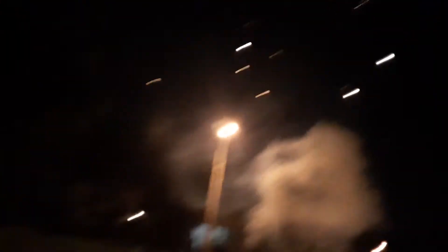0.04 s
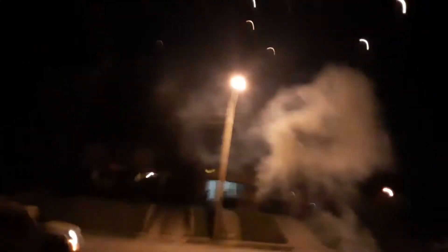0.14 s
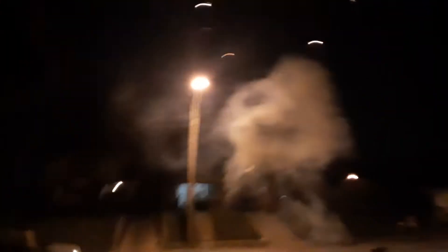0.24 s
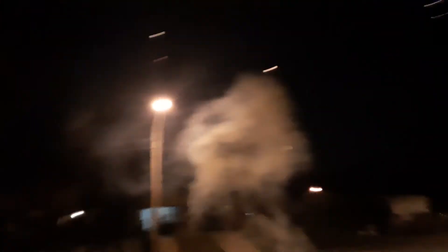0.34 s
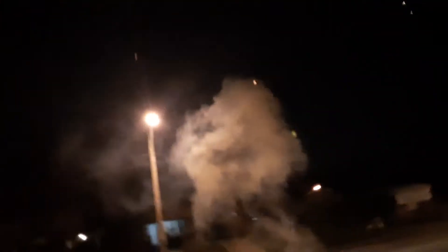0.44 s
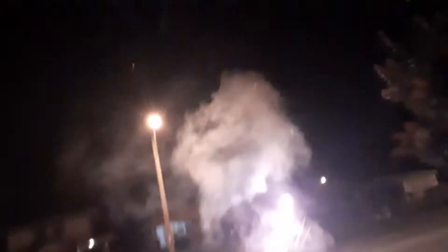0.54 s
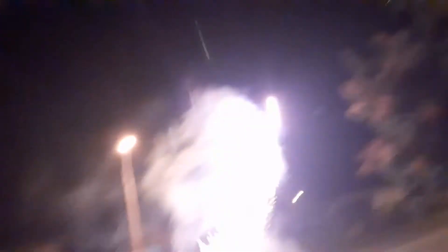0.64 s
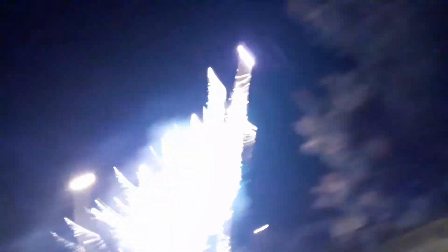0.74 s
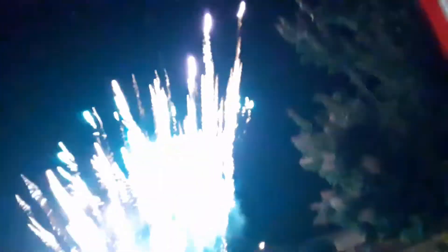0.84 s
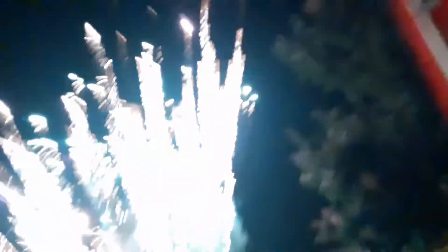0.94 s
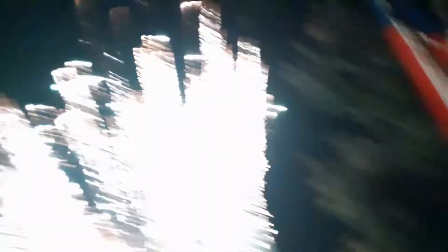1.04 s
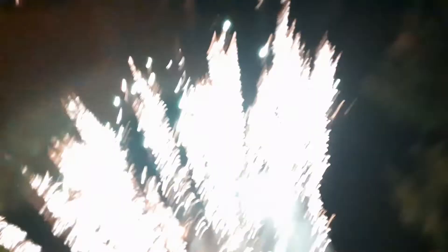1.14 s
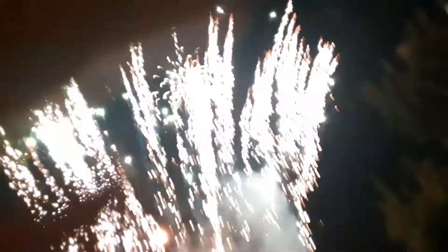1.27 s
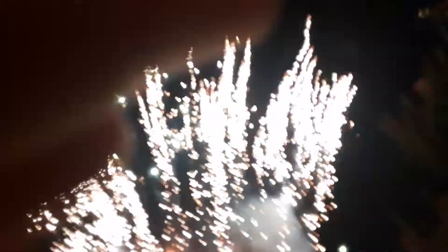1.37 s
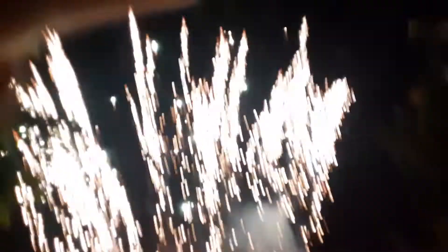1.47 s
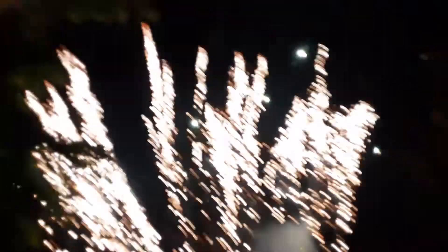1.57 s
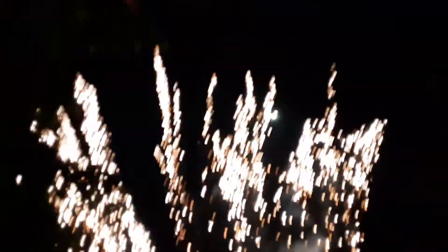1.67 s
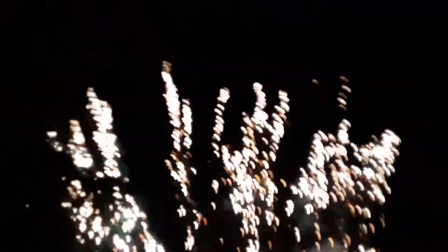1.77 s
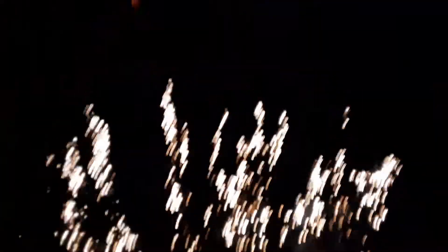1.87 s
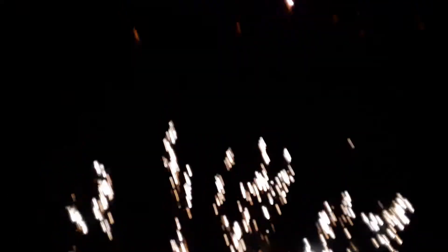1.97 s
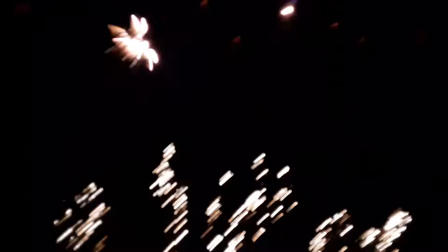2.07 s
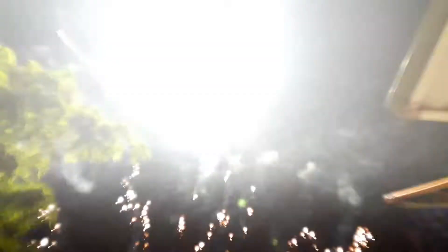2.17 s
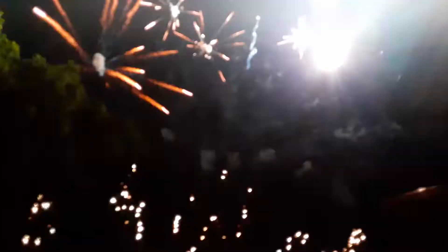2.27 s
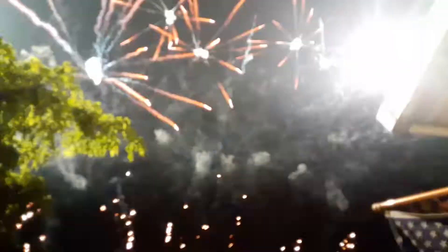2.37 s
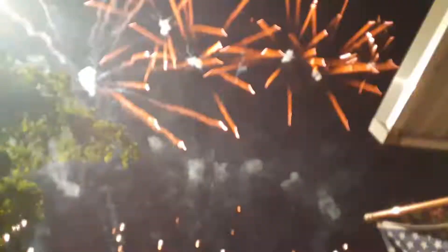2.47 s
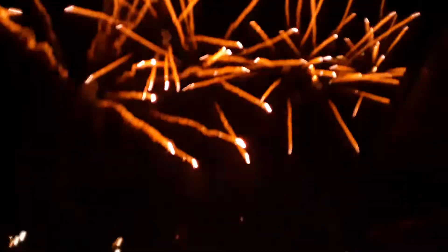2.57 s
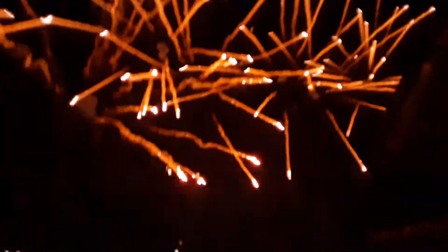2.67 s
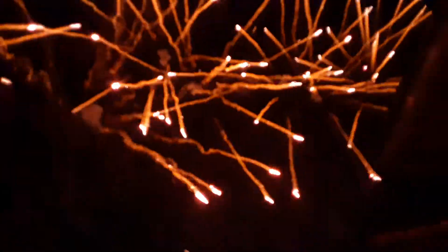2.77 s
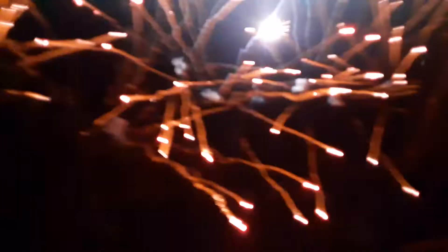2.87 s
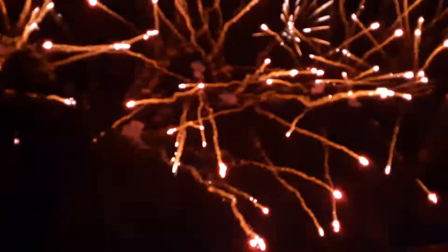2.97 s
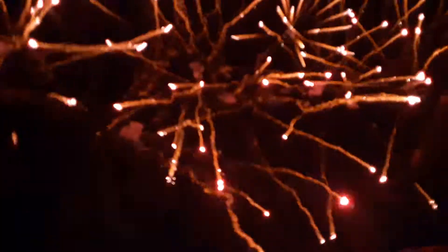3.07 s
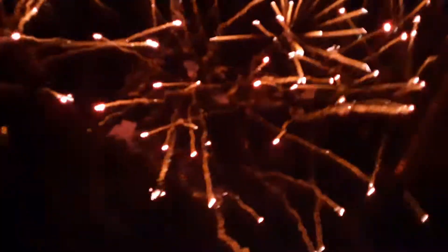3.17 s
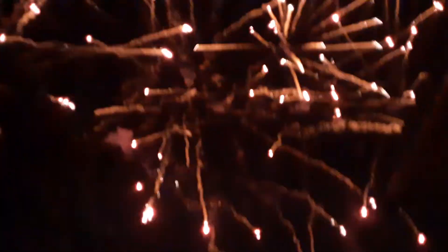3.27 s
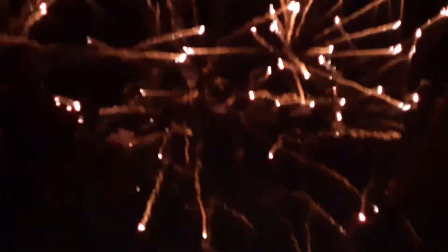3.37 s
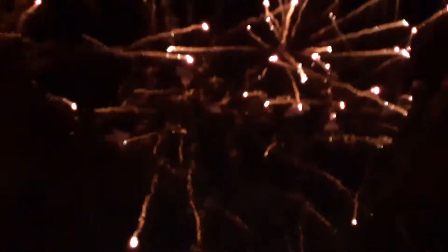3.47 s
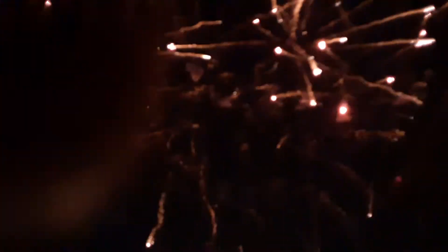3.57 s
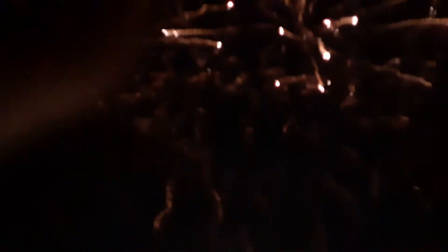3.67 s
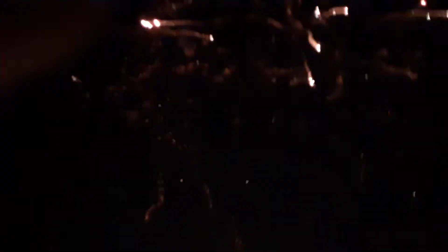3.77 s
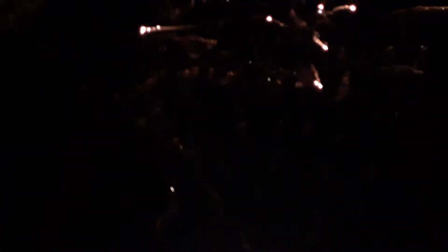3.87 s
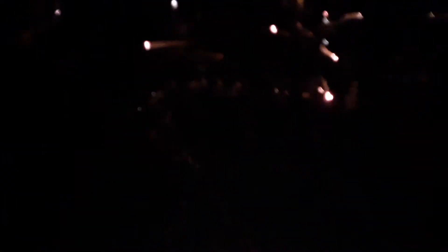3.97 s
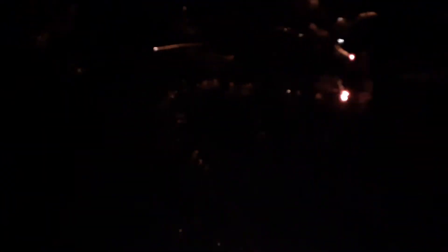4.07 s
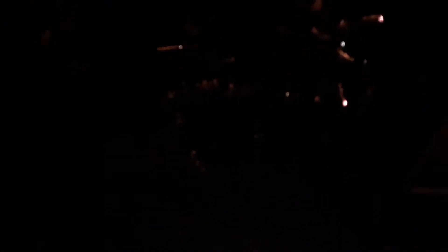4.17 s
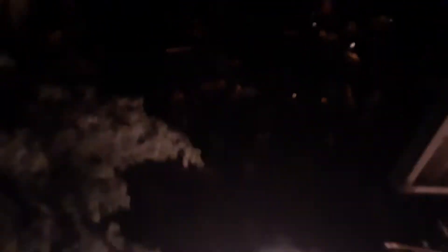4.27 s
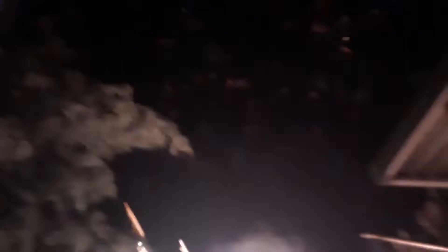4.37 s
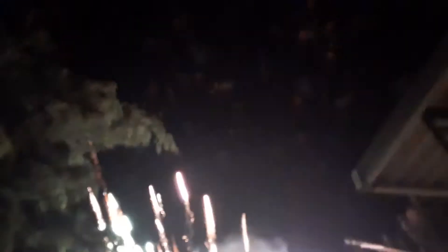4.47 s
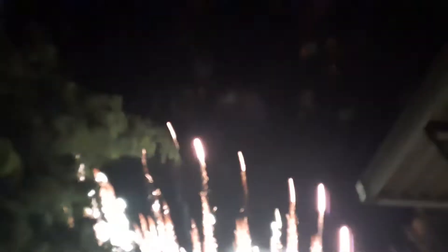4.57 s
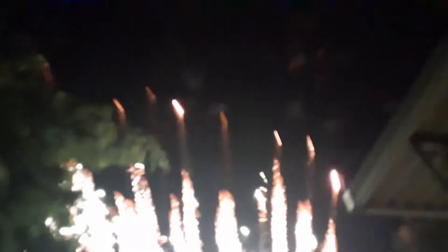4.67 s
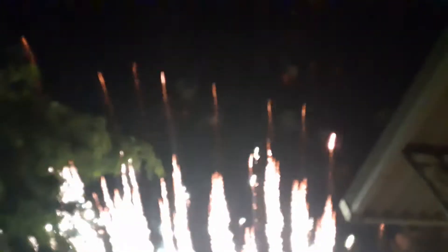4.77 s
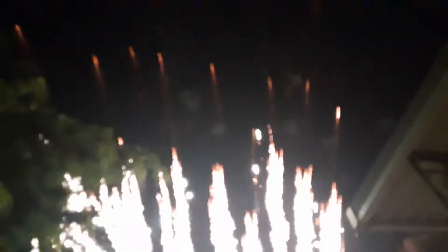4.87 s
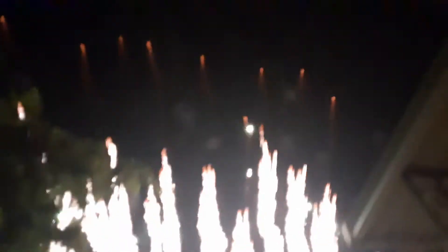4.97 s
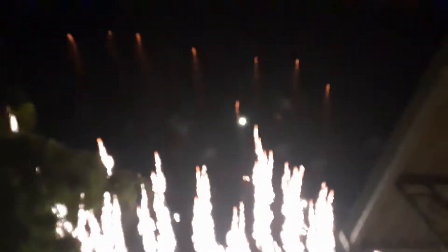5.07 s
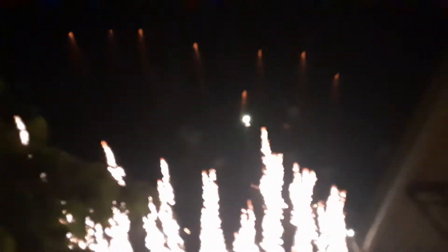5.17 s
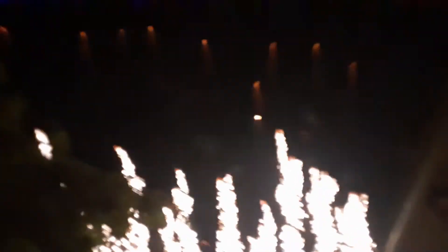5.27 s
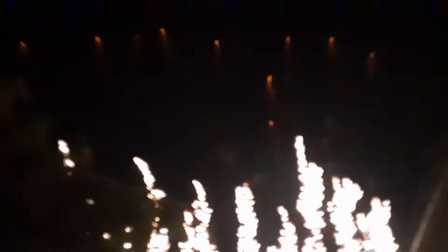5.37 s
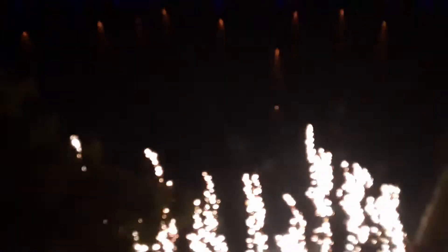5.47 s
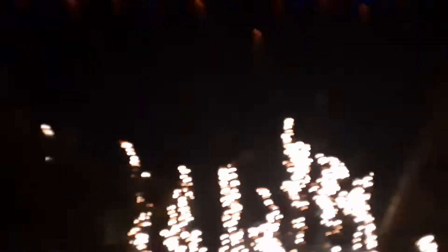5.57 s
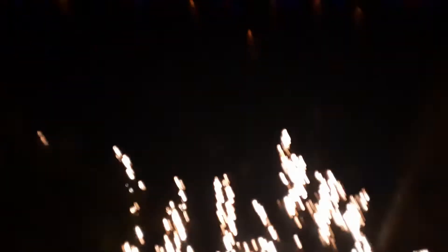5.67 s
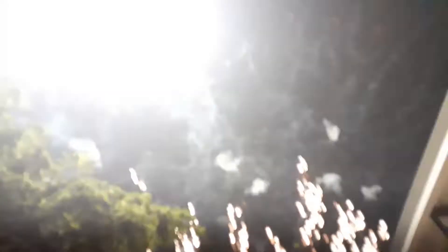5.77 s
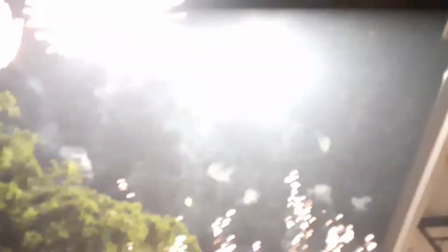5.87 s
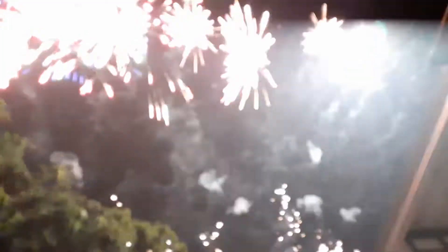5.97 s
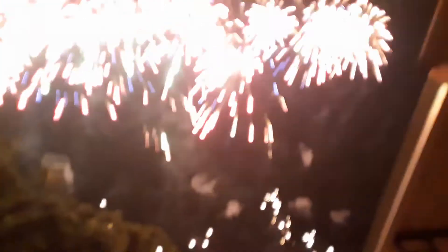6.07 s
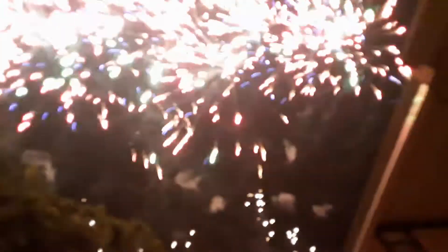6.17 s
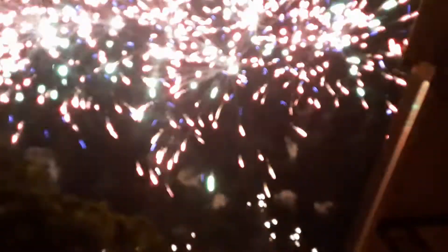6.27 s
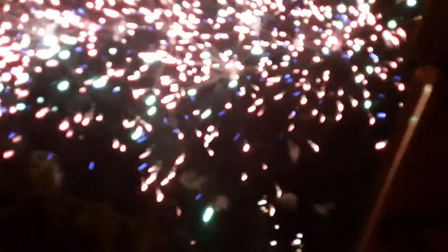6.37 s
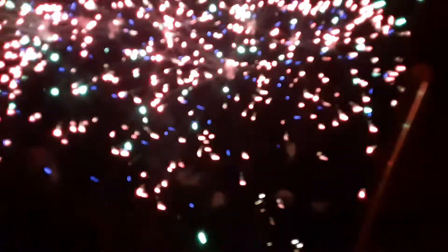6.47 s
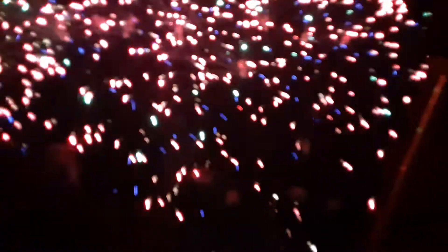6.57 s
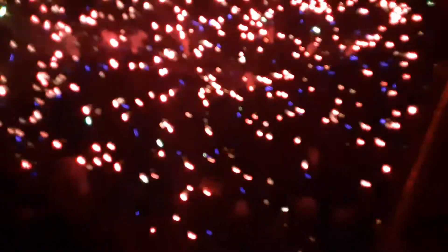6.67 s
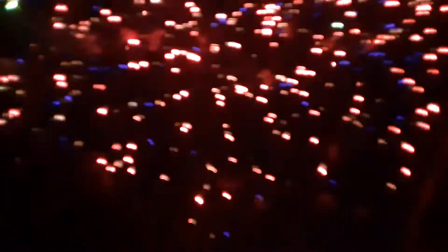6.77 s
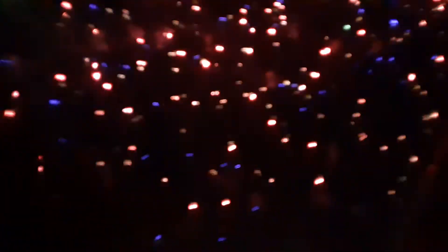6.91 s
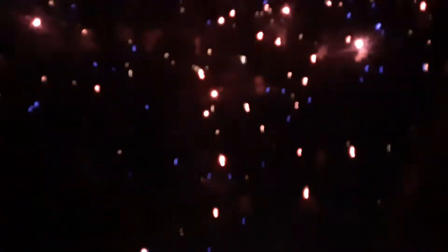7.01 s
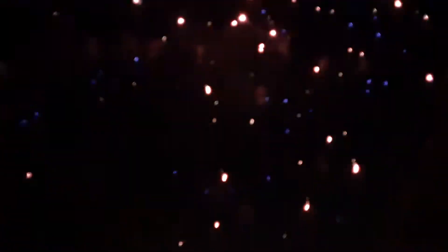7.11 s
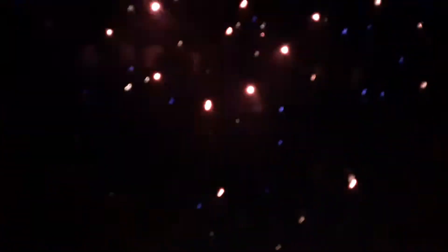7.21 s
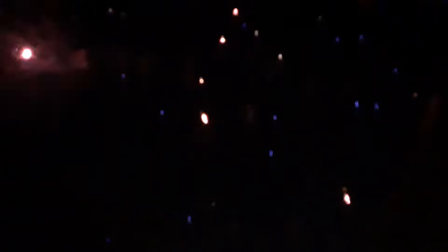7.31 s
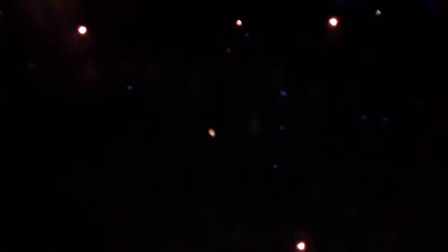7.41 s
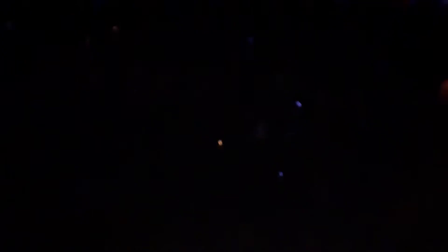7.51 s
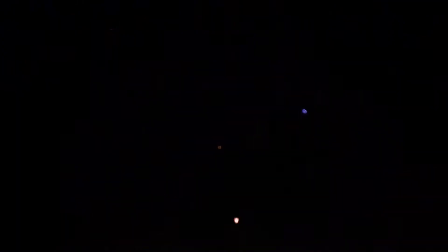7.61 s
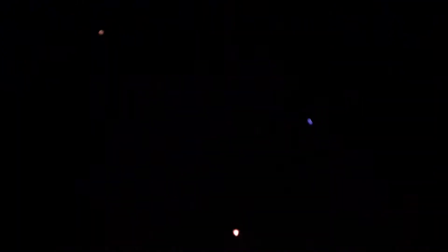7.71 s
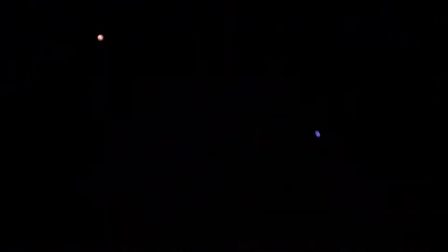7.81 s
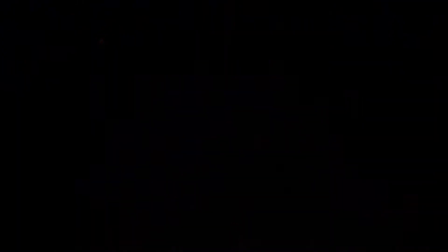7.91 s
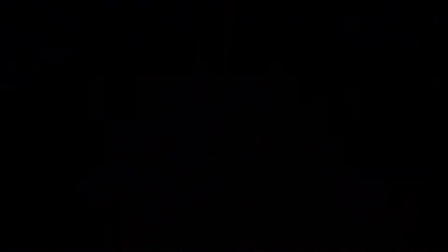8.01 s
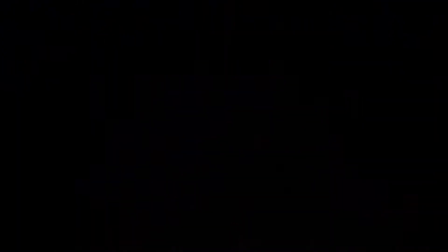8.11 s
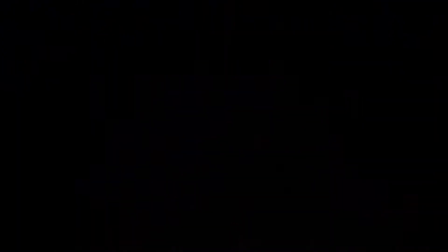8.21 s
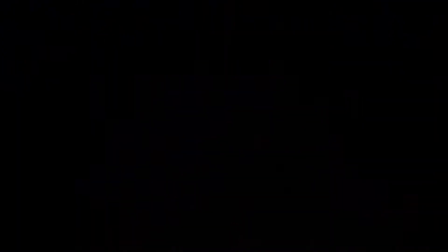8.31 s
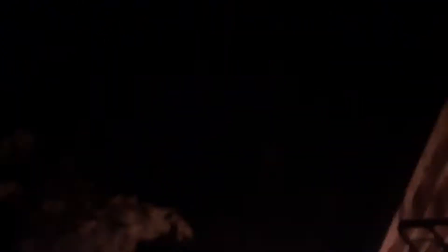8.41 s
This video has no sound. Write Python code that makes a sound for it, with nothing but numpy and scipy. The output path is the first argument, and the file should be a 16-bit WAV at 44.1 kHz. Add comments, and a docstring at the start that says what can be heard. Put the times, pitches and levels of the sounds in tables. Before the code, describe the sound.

A faint fuse hiss rises, and at 0.6 seconds a multi-shot firework fires about eleven sharp cracks with hollow thumps within a quarter second, echoing around a yard. Comets hiss softly as it fades, and a star crackles briefly at 1.3 seconds. From 2.1 to 2.6 seconds shells burst overhead in loud, uneven bangs with a few tiny pings, and one more bangs at 3 seconds. Each trails off among houses and trees. A second, slightly duller volley fires at 4.2 seconds. After a brief soft hiss, its shells burst in a tight cluster from 5.9 to 6.2 seconds and the echo dies away. Distant fireworks thud at about 8.1 and 8.3 seconds, and a third volley just begins at 8.4 seconds. A faint low hum and town rumble lie underneath. The phone microphone squashes the loudest peaks.

```python
"""A firework cake fires two quick volleys in a yard at night, and a third just begins. Each lift charge
sends out a shock wave, heard as a sharp crack, and sets its tube resonating with a hollow thump. About
a second and a half after a volley its shells burst overhead; houses and trees reflect every bang. Fuses
and comets hiss, a star crackles, and far fireworks thud over a low hum and the rumble of the town.
A phone's microphone colours the sound and its limiter holds down the peaks."""
import sys
import numpy as np
from scipy import signal
from scipy.fft import rfft, irfft
from scipy.io import wavfile
from scipy.ndimage import uniform_filter1d, minimum_filter1d

SR = 44100
rng = np.random.default_rng(int(sys.argv[2]) if len(sys.argv) > 2 else 0)


def output_pcm(signal):
    """Save a mono or channel-first signal as 16-bit PCM at the path in sys.argv[1].

    Samples are clipped to [-1, 1] before scaling.
    """
    pcm = np.clip(np.atleast_2d(signal).T, -1, 1) * 32767
    wavfile.write(sys.argv[1], SR, np.round(pcm).astype(np.int16))


N = 372644

# volleys, lit by a fuse that runs from tube to tube: (first shot [s], gap between shots [s], shots,
# level [dB], treble gain [dB], fuse level [dB], comet level [dB], comet burn time [s])
VOLLEYS = [(0.562, .0255, 11, 0.5, 2, -42, -40, 3.3), (4.235, .0203, 12, -.5, -4, -45.5, -64, .78),
           (8.44, .023, 11, -2, -9, -40.5, -47, 1)]
# low resonances of a shell burst: (frequency [Hz], level [dB], decay time T60 [s])
BURST_MODES = [(116.6, -18, 0.035), (245, 3, 0.018), (322, -6.5, 0.066), (447, -17.5, 0.022)]
# echo spectra of launches and far thuds, and of snaps and pings: (frequency [Hz], level [dB])
LAUNCH_ECHO = [(50, -2.5), (110, 6), (200, -2), (350, 1.5), (550, 5), (1050, 2), (2200, 5.5), (2700, 3.5),
               (3300, 0.5), (4500, 6.5), (7000, 7), (14000, 10.5)]
SNAP_ECHO = [(200, -3.5), (1000, -13.5), (4000, -1.5), (14000, -4)]


def undb(db):
    """Amplitude ratio of a level in decibels."""
    return 10 ** (np.asarray(db) / 20)


def on_log_axis(points, hz):
    """Interpolation of (frequency [Hz], value) points on a logarithmic frequency axis."""
    frequencies, values = np.transpose(points)
    return np.interp(np.log(np.maximum(hz, 1)), np.log(frequencies), values)


def convolve(x, response):
    """Linear filtering: convolution with an impulse response, cut to the input's length."""
    return signal.fftconvolve(np.atleast_2d(x), np.atleast_2d(response), axes=1)[:, :x.shape[-1]]


def colour(points, size=4096):
    """Minimum-phase impulse response of a spectrum, by folding its cepstrum onto positive time."""
    magnitude = undb(on_log_axis(points, np.fft.rfftfreq(size, 1 / SR)))
    cepstrum = irfft(np.log(magnitude))
    cepstrum[1:size // 2] *= 2
    cepstrum[size // 2 + 1:] = 0
    return irfft(np.exp(rfft(cepstrum)))


def unit(response):
    """Normalisation to a mean energy of one per channel."""
    return response / np.sqrt(np.mean(np.sum(response ** 2, axis=-1)))


def add(track, start_s, sound):
    """Superposition: a sound adds to the track from its start time on."""
    i = int(start_s * SR)
    part = sound[..., :max(N - i, 0)]
    track[:, i:i + part.shape[-1]] += part


def stereo_noise(size, apart_hz=800, bass_apart=0.073):
    """Spatial coherence: two microphone ports receive nearly the same bass but unrelated treble."""
    mid, side = rng.standard_normal((2, size))
    treble = signal.lfilter(*signal.butter(1, apart_hz, "high", fs=SR), side)
    side = treble + bass_apart * (side - treble)
    return np.array([mid + side, mid - side]) / np.sqrt(2)


def wavering(spectrum, flicker_db, rate_hz, bass_apart):
    """Random amplitude modulation makes coloured noise flicker; unit RMS."""
    flicker = np.interp(np.arange(N) / SR * rate_hz, np.arange(1024), rng.standard_normal(1024))
    noise = stereo_noise(N, bass_apart=bass_apart)
    sound = convolve(noise, colour(spectrum)) * undb(flicker_db * flicker)
    return sound / np.std(sound)


def yard(x, tint, near_db, near_s, build_s, patchy_db, late_hz=600):
    """Reverberation: dense early reflections off near walls, a long tail off far houses and trees."""
    # reverberation time among the houses: (frequency [Hz], decay time T60 [s])
    decay_times = [(100, 1.27), (330, 1.45), (800, 1.645), (2000, 1.89), (4000, 1.66), (7500, 1.44),
                   (13000, 0.76)]
    size = 2 * SR
    t = np.arange(size) / SR
    hz = np.fft.rfftfreq(size, 1 / SR)
    # single surfaces stand out as louder patches
    patches = np.interp(t, np.linspace(0, 2, 500), rng.standard_normal(500))
    spectrum = rfft(stereo_noise(size, bass_apart=0.033) * undb(patchy_db * patches))
    centres = np.transpose(decay_times)[0]
    tail = 0
    for share, (centre, t60) in zip(np.eye(len(decay_times)), decay_times):
        band = irfft(spectrum * on_log_axis(np.c_[centres, share], hz))
        build = 1 - np.exp(-t / (build_s * (1 + late_hz / centre)))  # low bands build up later
        tail = tail + band * build * np.exp(-np.log(1000) * t / t60)
    tail = tail * (1 + undb(near_db) * np.exp(-t / near_s))
    return convolve(convolve(x, unit(tail)), colour(tint))


def crack(fade_s, gas_db, gas_s, front=0.6, size=2048):
    """Shock wave: a steep front, a brief ragged decay, then a short rush of gas; unit energy."""
    t = np.arange(size) / SR
    envelope = np.exp(-(t / fade_s) ** 2) + undb(gas_db) * np.exp(-t / gas_s)
    return unit(stereo_noise(size, apart_hz=990) * envelope + front * signal.unit_impulse(size))


def thump(modes, rise_s, detune=0.067, lag_s=0.00026, size=6000):
    """Damped resonance: a pressure wave rings a few modes, detuned each time and offset at each port."""
    hz, db, t60 = np.transpose(modes)[:, :, None, None]
    hz = hz * np.exp(detune * rng.standard_normal(hz.shape))
    t = np.maximum(np.arange(size) / SR - lag_s * rng.standard_normal((2, 1)), 0)
    rings = undb(db) * np.exp(-np.log(1000) * t / t60) * np.sin(2 * np.pi * hz * t)
    return rings.sum(axis=0) * (1 - np.exp(-t / rise_s))


def night_air(level_db=-58.5):
    """Ambient noise floor: the faint, steady broadband hiss of the night air."""
    # spectrum of the air: (frequency [Hz], level [dB])
    air_spectrum = [(410, -34), (700, -9.5), (1800, -11.5), (6480, -20), (9350, -18), (13100, -20),
                    (16000, -36)]
    return undb(level_db) * wavering(air_spectrum, flicker_db=.3, rate_hz=20, bass_apart=.8)


def hum(throb_hz=14.5, jitter_s=.004, scatter_db=2, throb_db=-4):
    """Narrow-band noise hums low; a nearly periodic pulse train in the same band makes it throb."""
    # spectrum of the hum: (frequency [Hz], level [dB])
    hum_spectrum = [(50, -19), (95, 4.5), (112, 10.5), (135, 7.5), (200, -10.5), (1000, -78)]
    # envelope of the hum: (time [s], level [dB])
    hum_levels = [(0, -52.5), (1.2, -50.5), (2.2, -51), (4.1, -36.5), (5.1, -49), (5.9, -47), (7.2, -62),
                  (8.4, -40.5)]
    beats = np.zeros((1, N))
    count = int(N / SR * throb_hz)
    for k, (late, strong) in enumerate(rng.standard_normal((count, 2))):
        add(beats, max(k / throb_hz + jitter_s * late, 0), undb([scatter_db * strong]))
    throb = convolve(beats, colour(hum_spectrum))
    drone = wavering(hum_spectrum, flicker_db=2.0, rate_hz=13, bass_apart=0.11)
    sound = undb(throb_db) * throb / np.std(throb) + drone
    level_db = np.interp(np.arange(N) / SR, *np.transpose(hum_levels))
    return undb(level_db) * sound / np.std(sound)


def combustion_power(roar_db=3):
    """Incoherent sources add in power: a fuse hisses and roars up to each volley, comets fade after it."""
    fuse_rise, roar_rise, comet_fade, burn_out = 27.5, 17, 7.5, 120  # [dB/s]
    t = np.arange(N) / SR
    hiss_power, roar_power = 0, 0
    for start, *_, fuse_db, comet_db, burn_s in VOLLEYS:
        before, after = np.maximum(start - t, 0), np.maximum(t - start, 0)
        spent = np.maximum(after - burn_s, 0)
        flame_db = fuse_db - burn_out * after
        fuse = undb(flame_db - fuse_rise * before)
        comets = (t > start) * undb(comet_db - comet_fade * after - burn_out * spent)
        hiss_power += fuse ** 2 + comets ** 2
        roar_power += undb(flame_db + roar_db - roar_rise * before) ** 2
    return hiss_power, roar_power


def rumble(roar_power, town_db=-47.5):
    """Low-frequency noise: the town's steady rumble and the fuse's roar add in power."""
    # spectrum of the rumble: (frequency [Hz], level [dB])
    town_spectrum = [(25, -31), (60, 0), (110, 0), (170, -4), (250, -2), (330, 4), (450, -6.5),
                     (700, -12.5), (1200, -21.5), (5000, -65)]
    amplitude = np.sqrt(undb(town_db) ** 2 + roar_power)
    return amplitude * wavering(town_spectrum, flicker_db=1.5, rate_hz=29, bass_apart=0.049)


def far_thuds():
    """Low-pass transmission: of distant fireworks only a soft thump and its echo arrive."""
    # distant bursts: (time [s], level [dB])
    far_bursts = [(5.548, -38), (8.064, -15), (8.085, -23.5), (8.3, -24)]
    thuds = np.zeros((2, N))
    for s, db in far_bursts:
        add(thuds, s, undb(db) * thump(BURST_MODES, rise_s=0.00085))
    thuds = signal.sosfilt(signal.butter(4, 380, fs=SR, output="sos"), thuds)
    echo = yard(thuds, LAUNCH_ECHO, near_db=14.0, near_s=0.066, build_s=0.015, patchy_db=2.5)
    return thuds + undb(7.5) * echo


def flame_hiss(hiss_power, swell_s=5.77, width_s=0.16, swell_db=-50.5):
    """Combustion noise of fuses and comets; it swells briefly before the second volley's shells burst."""
    # spectrum of the hiss: (frequency [Hz], level [dB])
    hiss_spectrum = [(200, -21), (600, 5), (1000, 8.5), (2100, 8.5), (3000, -0.5), (5000, -8),
                     (8000, -13.5), (16000, -10)]
    t = np.arange(N) / SR
    swell = undb(swell_db) * np.exp(-((t - swell_s) / width_s) ** 2)
    amplitude = np.sqrt(hiss_power + swell ** 2)
    return amplitude * wavering(hiss_spectrum, flicker_db=.7, rate_hz=80, bass_apart=.8)


def pings(peak_s=0.0025, size=2000):
    """Heavily damped sinusoids swell and die within milliseconds, and the yard echoes them."""
    # short pings among the bangs: (time [s], frequency [Hz], level [dB])
    tones = [(2.513, 2050, -15), (2.643, 2040, -12), (3.097, 1526, -22), (4.97, 1850, -36),
             (5.02, 1770, -35), (8.112, 2590, -42), (8.206, 2500, -42)]
    t = np.arange(size) / SR
    envelope = t / peak_s * np.exp(1 - t / peak_s)
    rings = np.zeros((2, N))
    for s, hz, db in tones:
        phases = 2 * np.pi * rng.random((2, 1))
        add(rings, s, undb(db) * envelope * np.sin(2 * np.pi * hz * t + phases))
    return rings + undb(-9) * yard(rings, SNAP_ECHO, near_db=24, near_s=0.027, build_s=.006, patchy_db=0)


def snaps(pops, crack_db, echo_db, fade_s):
    """Small impulsive sources: tiny charges radiate a snap with little bass, and the yard reflects it."""
    # spectrum of a snap: (frequency [Hz], level [dB])
    snap_spectrum = [(100, -14), (400, -7), (1000, -7.5), (2000, -4.5), (3000, -8), (4500, -8),
                     (8000, -11.5), (16000, -15.5)]
    cracks, blasts = np.zeros((2, 2, N))
    for s, db in pops:
        add(cracks, s, undb(db + crack_db) * crack(fade_s, gas_db=-21.0, gas_s=0.0053))
        add(blasts, s, undb([db + echo_db]))
    echo = yard(blasts, SNAP_ECHO, near_db=22, near_s=0.039, build_s=0.002, patchy_db=3.5)
    return convolve(cracks + echo, unit(colour(snap_spectrum)))


def fuse_sparks(lead_s=.006, spit_db=-28):
    """Weak transients: the fuse spits just before each volley, and stray sparks snap."""
    # stray sparks: (time [s], level [dB])
    sparks = [(4.11, -40), (8.113, -45), (8.206, -39)]
    spits = [(start - lead_s, spit_db) for start, *_ in VOLLEYS]
    return snaps(spits + sparks, crack_db=17, echo_db=14, fade_s=.007)


def crackling_star():
    """An irregular train of very short shocks: one star pops apart."""
    # pops of the star: (time [s], level [dB])
    pops = [(1.2899, 1.5), (1.2973, 9), (1.3013, -13.5), (1.3060, -15), (1.3086, -0.5), (1.3133, -15)]
    return snaps(pops, crack_db=5.0, echo_db=4.5, fade_s=0.0003)


def buffet(blasts, relative_db=-17, top_hz=75, follow_s=0.024):
    """Flow noise: the air of each blast shakes the two ports separately with a deep rumble."""
    power = uniform_filter1d(np.mean(blasts ** 2, axis=0), int(follow_s * SR))
    gusts = signal.sosfilt(signal.butter(3, top_hz, fs=SR, output="sos"), rng.standard_normal((2, N)))
    return undb(relative_db) * np.sqrt(np.abs(power)) * gusts / np.std(gusts)


def bangs(shots, tint, modes, crack_db, thump_db, blast_db, fade_s, delay_s, rise_s):
    """Shock, then resonance: returns the direct sound and the clean blast that excites the yard."""
    cracks, thumps, blasts = np.zeros((3, 2, N))
    for s, sharp_db, low_db in shots:
        add(cracks, s, undb(sharp_db + crack_db) * crack(fade_s, gas_db=-20, gas_s=.012))
        add(thumps, s + delay_s, undb(low_db + thump_db) * thump(modes, rise_s))
        add(blasts, s, undb([sharp_db + blast_db]))
    response = unit(colour(tint))
    return convolve(cracks, response) + thumps, convolve(blasts, response) + thumps


def shell_bursts():
    """Blast waves from overhead reflect off the ground and a house wall, and the street reverberates."""
    # bursting shells: (time [s], level [dB])
    shells = [(2.1186, -1.5), (2.267, -22), (2.2965, -4.5), (2.3764, -5.5), (2.411, -11.5), (2.4932, -7.5),
              (2.5154, -16.5), (2.5493, -15.5), (2.6206, -7.5), (3, -7.5), (5.9055, -4), (5.939, -8),
              (6.0068, -6.5), (6.0276, -12.5), (6.0626, -10), (6.1, -12.5), (6.14, -16.5), (6.1746, -9.5),
              (6.225, -26)]
    # spectra of their crack and of their echo: (frequency [Hz], level [dB])
    crack_spectrum = [(100, -6), (620, 11), (850, 1.5), (2200, -4.5), (3000, -8.5), (5000, -10.5),
                      (8000, -14), (16000, -16.5)]
    echo_spectrum = [(50, -11), (110, 2), (180, 1), (330, 4.5), (470, 4.5), (620, 1), (900, 2), (2500, 4),
                     (7000, 3.5), (14000, 7)]
    thump_slope = 0.71  # [dB per dB of crack]: a fainter shell loses more crack than thump
    shots = [(s, db, thump_slope * db) for s, db in shells]
    direct, blast = bangs(shots, crack_spectrum, BURST_MODES, crack_db=22.5, thump_db=3.5, blast_db=17.5,
                          fade_s=0.0038, delay_s=0.001378, rise_s=0.00072)
    echo = yard(blast, echo_spectrum, near_db=11.0, near_s=0.016, build_s=.014, patchy_db=1.0)
    sound = direct + undb(3.5) * echo
    reflection = signal.lfilter(*signal.butter(1, 1100, fs=SR), direct)
    add(sound, .0096, undb(-6.0) * reflection)  # ground
    add(sound, .018, undb(-2.5) * reflection)  # house wall
    return sound


def firing_sequence(jitter_s=.0016, scatter_db=2, last_shot_db=-5):
    """Quasi-periodic ignition of unequal tubes: rows of (time [s], crack level [dB], thump level [dB])."""
    shots = []
    for start, gap, tubes, db, *_ in VOLLEYS:
        chance = rng.standard_normal((tubes, 2))
        chance[0] = 0  # the first shot is on time and at the volley's level
        for k, (late, sharp) in enumerate(chance):
            charge_db = db + last_shot_db * (k == tubes - 1)
            shots.append((start + k * gap + jitter_s * late, charge_db + scatter_db * sharp, charge_db))
    return shots


def volley_treble(x, shelf_hz=7000):
    """A high shelf makes each volley brighter or duller than the others."""
    treble = signal.sosfiltfilt(signal.butter(2, shelf_hz, "high", fs=SR, output="sos"), x)
    gain = np.ones(N)
    for start, _, _, _, treble_db, *_ in VOLLEYS:
        gain[int(start * SR):] = undb(treble_db)
    return x + (gain - 1) * treble


def launches():
    """Impulse excitation of a resonator: each lift charge cracks at the muzzle and its tube thumps."""
    # spectrum of the muzzle crack: (frequency [Hz], level [dB])
    crack_spectrum = [(100, -13), (700, 1.5), (1050, 2.5), (1400, -2), (2100, -2), (2700, -6.5),
                      (3300, -4.5), (4100, -10.5), (8000, -13), (16000, -13.5)]
    # resonances of a launch tube: (frequency [Hz], level [dB], decay time T60 [s])
    tube_modes = [(107, -16.5, 0.048), (231, 2, 0.021), (308, -5, 0.044), (3300, -17, 0.02)]
    direct, blast = bangs(firing_sequence(), crack_spectrum, tube_modes, crack_db=11.5, thump_db=3.5,
                          blast_db=8.5, fade_s=.0036, delay_s=.003, rise_s=0.0021)
    echo = yard(blast, LAUNCH_ECHO, near_db=7.5, near_s=.051, build_s=.0027, patchy_db=2.5)
    return volley_treble(direct + undb(-5.5) * echo)


def scene():
    """Superposition of volleys and bursts, the small sounds of the fire and the night around them."""
    blasts = launches() + shell_bursts()
    small_sounds = crackling_star() + fuse_sparks()
    foreground = blasts + buffet(blasts) + small_sounds + pings()
    hiss_power, roar_power = combustion_power()
    return foreground + far_thuds() + rumble(roar_power) + flame_hiss(hiss_power) + night_air() + hum()


def record(dry, ceiling=.92, hold_s=.006, top_hz=16000):
    """Transduction in a phone: microphone response, look-ahead limiting per channel, then a low-pass."""
    # response of the ports, notched in the treble: (frequency [Hz], gain [dB])
    port_response = [(20, -38), (45, -10), (90, 1), (7700, -1.5), (9300, -13.5), (10200, -14.5),
                     (12000, -7.5), (16000, -9.5)]
    # unequal sensitivity of the ports: (frequency [Hz], left minus right [dB])
    port_balance = [(50, 3), (250, 0.5), (600, 2), (3500, 0.9), (8000, -1.2), (12000, 3.5)]
    ports = [colour([(hz, side * db / 2) for hz, db in port_balance]) for side in (1, -1)]
    picked_up = convolve(convolve(dry, colour(port_response)), np.array(ports))
    hold = int(hold_s * SR)
    gain = ceiling / np.maximum(np.abs(picked_up), ceiling)
    gain = uniform_filter1d(minimum_filter1d(gain, hold), hold)
    return signal.sosfilt(signal.ellip(10, .2, 80, top_hz, fs=SR, output="sos"), picked_up * gain)


dry = scene()
out = record(dry)
output_pcm(out)
```